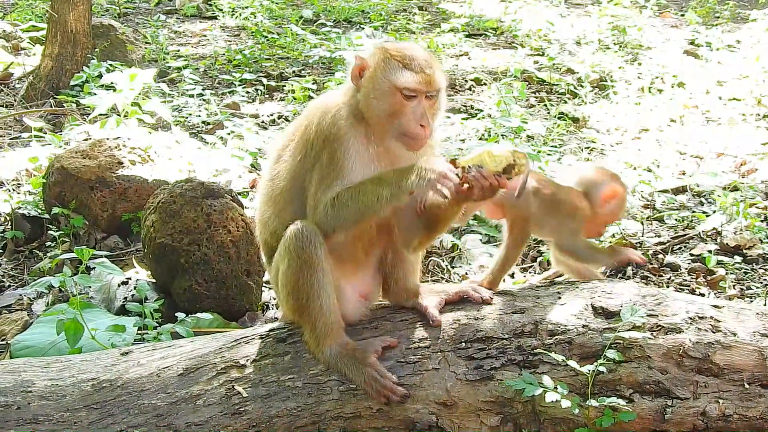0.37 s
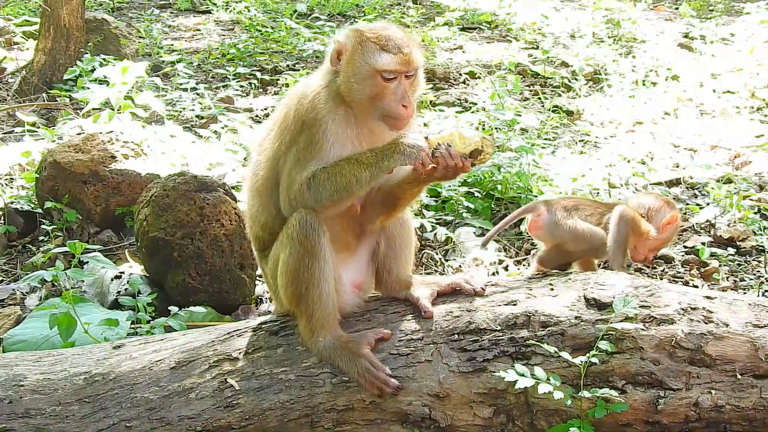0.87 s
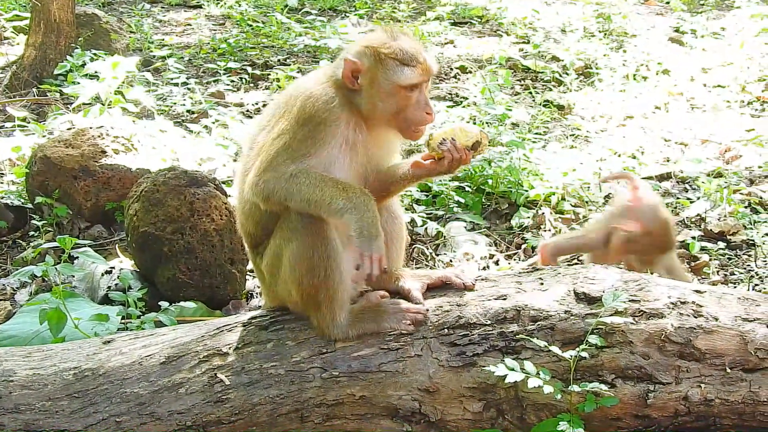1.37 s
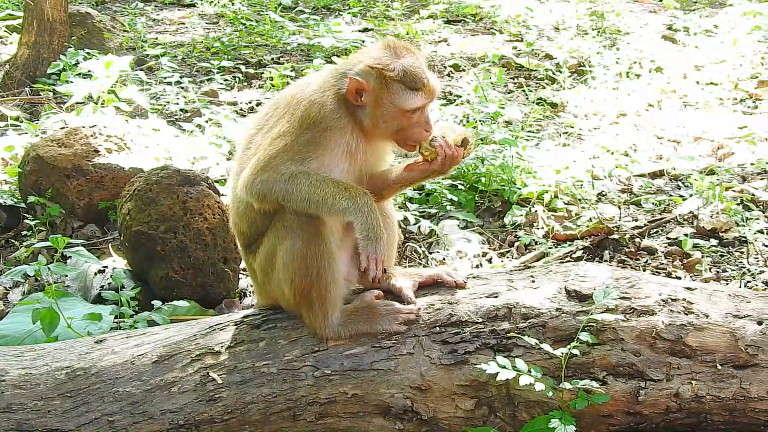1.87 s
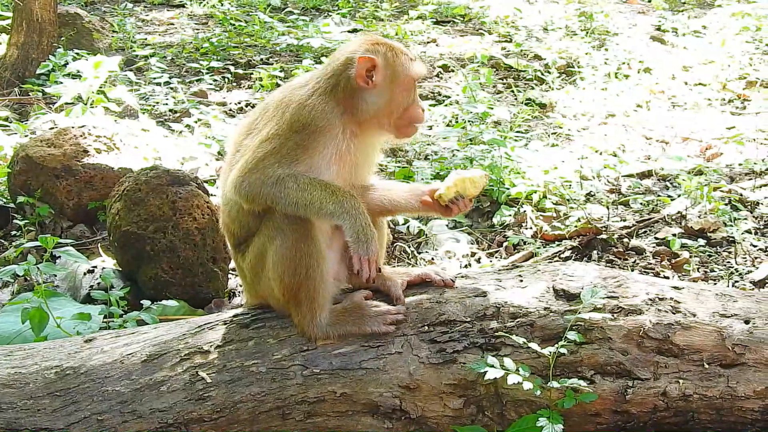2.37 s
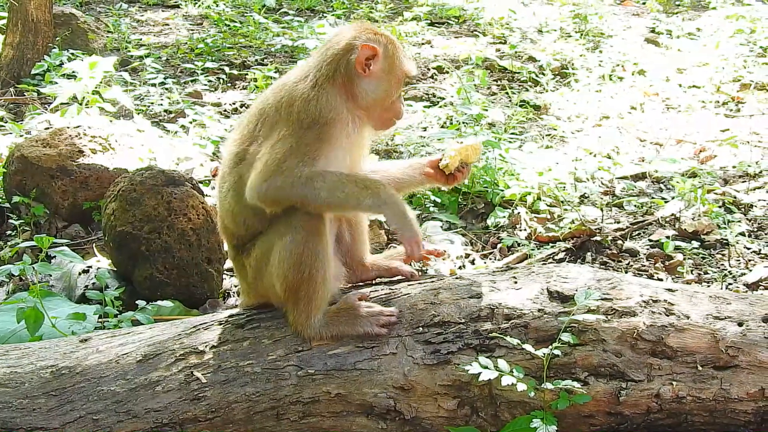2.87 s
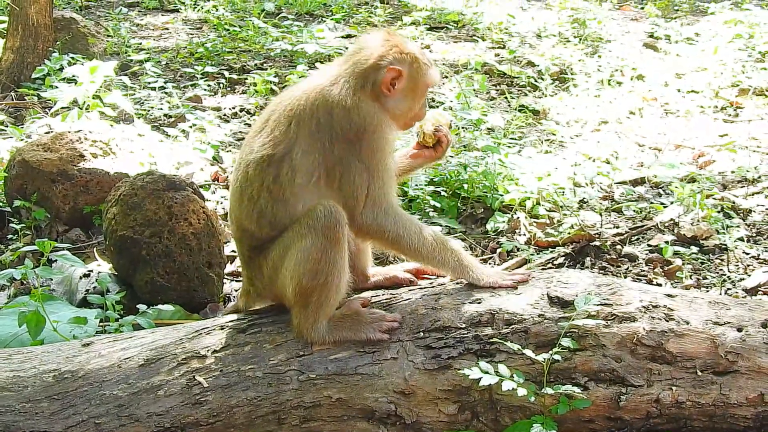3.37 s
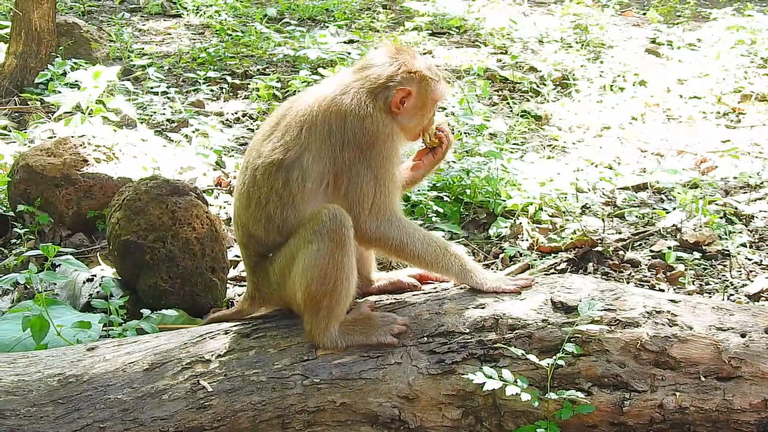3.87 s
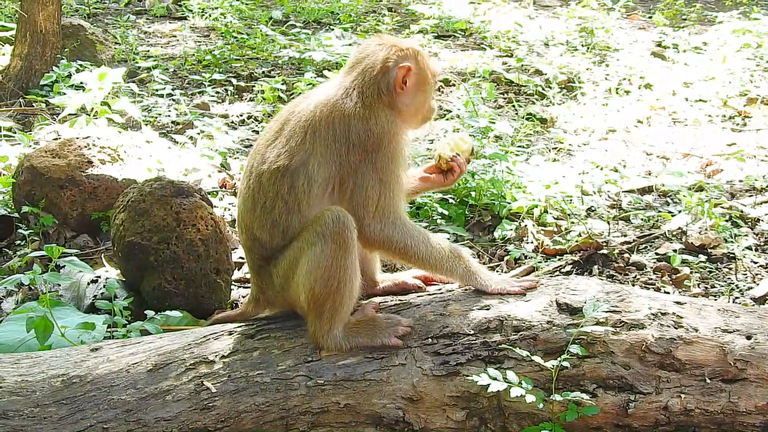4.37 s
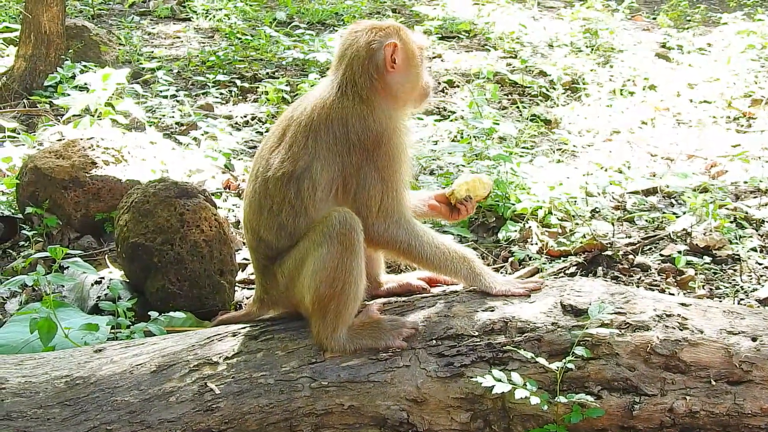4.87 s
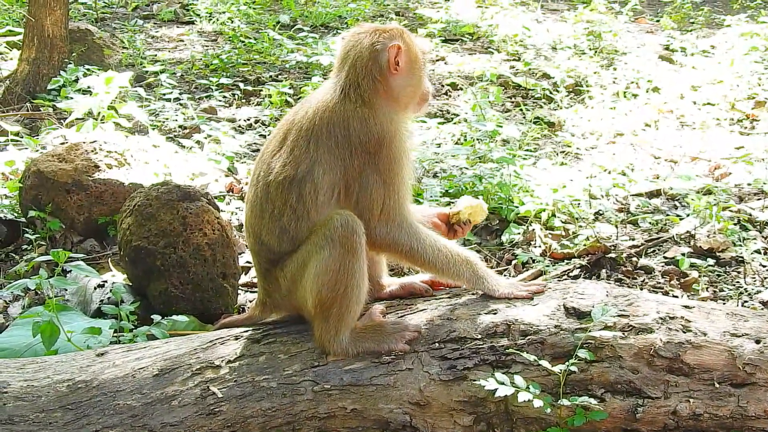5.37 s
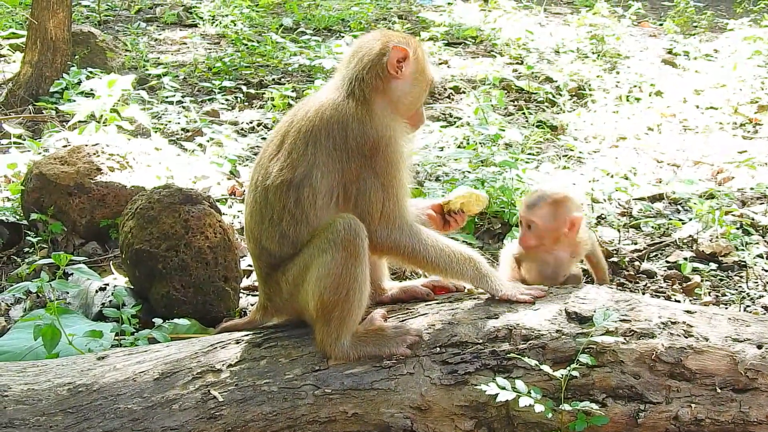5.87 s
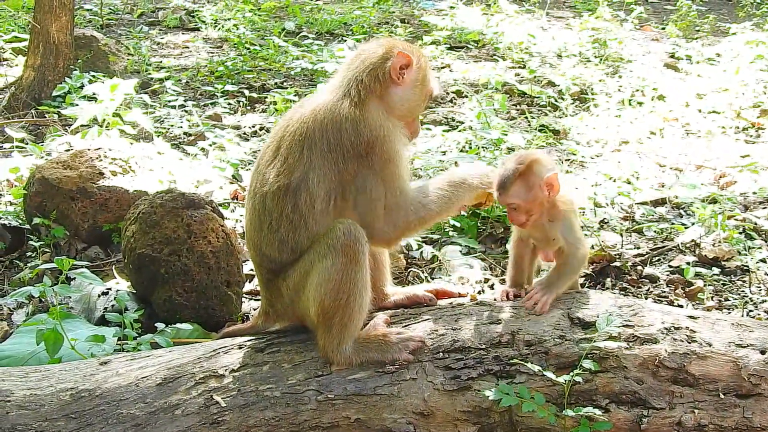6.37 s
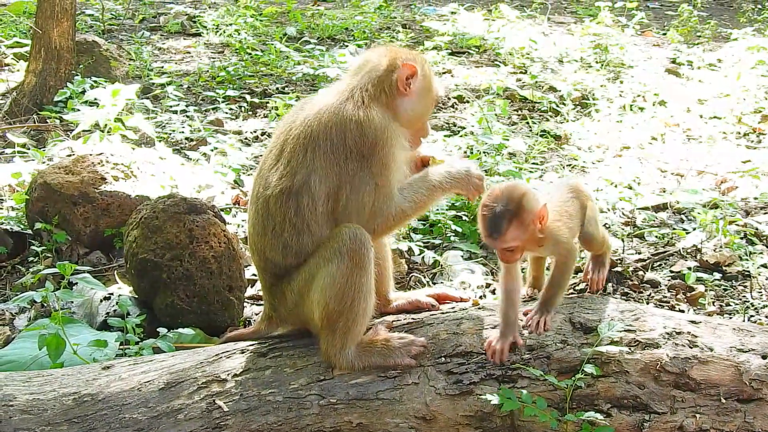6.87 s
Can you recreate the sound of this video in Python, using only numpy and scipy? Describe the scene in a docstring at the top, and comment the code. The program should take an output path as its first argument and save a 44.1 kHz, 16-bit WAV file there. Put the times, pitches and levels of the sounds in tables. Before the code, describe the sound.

In a sunny forest a cicada chorus whines steadily on one high, narrow pitch. A near bird gives crisp rising double ticks almost three times a second, with another bird's faint low drooping notes between. A lone cicada slightly right buzzes, sings four sagging phrases, then winds down. Leaves rustle, twigs crack and faint traffic rumbles. Open stereo microphone, with short echoes off the trees.

```python
"""A forest at midday. From the start a cicada chorus whines on one narrow band, from rows of ringing clicks, over
filtered noise for traffic rumble, leaves and thin high insects; one bird gives low, mostly drooping notes and a
near bird ticks upward in pairs, both as gliding tones. Twigs crack as noise bursts; a lone cicada, buzzing idly to
one side, then sings sagging phrases. Faint hoarse tone blips and soft patter sound, a farther bird slides down, and
the lone cicada winds down to its buzz. Decaying noise tails scatter all but the background noise off the trees."""
import sys
import numpy as np
from scipy import signal
from scipy.fft import rfft, irfft, next_fast_len
from scipy.io import wavfile
from scipy.ndimage import uniform_filter1d

SR = 44100
rng = np.random.default_rng(int(sys.argv[2]) if len(sys.argv) > 2 else 0)


def transcribe(signal):
    """Save signal, clipped to [-1, 1], as a 16-bit WAV file at the path in sys.argv[1]."""
    frames = np.atleast_2d(signal).T
    limited = np.clip(frames, -1, 1)
    pcm = np.round(limited * 32767).astype(np.int16)
    wavfile.write(sys.argv[1], SR, pcm)


def undo_db(level):
    """Turn decibels back into plain size, where 20 dB means ten times bigger."""
    steps = np.asarray(level, float) / 20
    return 10 ** steps


N = 319284
T = np.arange(N) / SR
SIZE = next_fast_len(N + SR)
HZ = np.arange(SIZE // 2 + 1) * SR / SIZE
LEAN_RIGHT = undo_db(np.array([[-.8], [.8]]))  # left and right gains


def unit(x):
    """Normalisation: scales a signal to rms 1."""
    return x / np.sqrt(np.mean(np.abs(x) ** 2))


def walk(rate):
    """Low-passed chance: random values at a rate per second, smoothed twice, with spread near 1."""
    hold = int(SR / rate)
    steps = np.repeat(rng.standard_normal(N // hold + 1), hold)
    return 1.2 * uniform_filter1d(uniform_filter1d(steps, hold), hold)[:N]


def ramp(s, length):
    """Linear onset: 0 before time s, rising straight to 1 over length."""
    return np.clip((T - s) / length, 0, 1)


def two_ears(mid, side, alike):
    """Interaural coherence: a shared and an opposed part; alike 1 is the same left and right."""
    alike = np.clip(alike, 0, 1)
    return np.sqrt(1 + alike) * mid + np.sqrt(1 - alike) * side * np.array([[1], [-1]])


def hiss(gain, alike, lag=0):
    """Spectral shaping: stereo noise of rms 1 with the given gain per frequency, left delayed by lag samples."""
    mid, side = irfft(rfft(rng.standard_normal((2, SIZE))) * gain, SIZE)[:, :N]
    left, right = two_ears(mid, side, alike)
    return unit(np.array([np.roll(left, lag), right]))


def colour(table):
    """Spectral envelope: gain per frequency through points of (frequency [Hz], level [dB])."""
    hz, db = np.transpose(table)
    return undo_db(np.interp(np.log(HZ + 1), np.log(hz), db, left=-120, right=-120))


def forest(x, t60, wet_db, delay, alike, grain_db=0.):
    """Multiple scattering: direct sound plus a tail of noise decaying 60 dB in t60 s, building up over delay s.

    Random steps of spread grain_db lump the tail into single trunks."""
    t = np.arange(SR) / SR
    lumps = undo_db(grain_db * np.repeat(rng.standard_normal(SR // 300 + 1), 300)[:SR])
    envelope = undo_db(-60 * t / t60) * (1 - np.exp(-t / delay)) * lumps
    mid, side = rng.standard_normal((2, SR)) * envelope
    tail = two_ears(mid, side, alike)
    tail = tail / np.sqrt(np.sum(tail ** 2, axis=1, keepdims=True))
    scattered = irfft(rfft(x * np.ones((2, 1)), SIZE) * rfft(tail, SIZE), SIZE)[:, :N]
    return x + undo_db(wet_db) * scattered


def tymbal(rate_hz, scatter_s, uneven_db, ring_hz, width_hz, accent_db=0., order=5):
    """Impulse-driven resonance: clicks at a rate each set off a short ring; a complex wave of rms 1."""
    cycles = np.cumsum(rate_hz) / SR + rng.random()
    timing, strength = rng.standard_normal((2, 4000))
    count = np.arange(1, int(cycles[-1]))
    at = np.interp(count, cycles, T)
    at = np.clip(at + np.interp(at, T, scatter_s) * timing[count], 0, T[-1])
    phase = 2 * np.pi * np.cumsum(ring_hz) / SR
    size = undo_db(uneven_db * strength[count] + accent_db * (count % 4 == 0))  # ribs buckle in fours
    clicks = np.zeros(N, complex)
    # shifted down to 0 Hz, so that a low-pass acts as the ring and follows its pitch
    np.add.at(clicks, (at * SR).astype(int), size * np.exp(-1j * np.interp(at, T, phase)))
    ring = signal.butter(order, width_hz / 2, fs=SR, output="sos")
    return unit(signal.sosfilt(ring, clicks)) * np.exp(1j * phase)


def whistle(out, s, length, hz0, hz1, db, bend=1., flutter=0., flutter_hz=60., late=1., point=0.23,
            hoarse_hz=0.):
    """Frequency modulation: adds a gliding near-sine note at time s.

    bend over 1 slows the glide towards its end, late over 1 puts the loudest part later, a higher point
    sharpens the swell, hoarse_hz shakes the pitch."""
    u = np.arange(int(length * SR)) / (length * SR)
    shake = hoarse_hz * np.repeat(rng.standard_normal(len(u) // 128 + 1), 128)[:len(u)]
    hz = hz1 + (hz0 - hz1) * (1 - u) ** bend + shake
    tone = np.sin(2 * np.pi * np.cumsum(hz) / SR)
    tremolo = 1 + flutter * np.sin(2 * np.pi * (flutter_hz * length * u + rng.random()))
    shape = np.sin(np.pi * u ** late) ** point * tremolo
    out, i = out.copy(), max(int(s * SR), 0)
    out[i:i + len(u)] += (undo_db(db) * shape * tone)[:N - i]
    return out


def chorus():
    """Superposed resonators: five cicadas near one click rate waver together and swell singly; two lead."""
    ring_hz, waver_hz, waver_s, waver_low_s = 5428, 29.9, .8, 2.93  # the pitch is lowest at waver_low_s
    hz = ring_hz - waver_hz * np.cos(2 * np.pi * (T - waver_low_s) / waver_s)
    db, pan_db = -43 + 0.5 * walk(4.05), -1.1 + 0.88 * walk(1.3)
    voices = [(57.2, 0, -10), (61, -1.5, 20), (56.3, -4, 10), (59, -6, -25), (63, -6, 25)]
    out = 0
    # (click rate [Hz], level [dB], ring offset [Hz])
    for rate_hz, gain_db, off_hz in voices:
        rate = rate_hz * hz / ring_hz * (1 + .008 * walk(5.0))
        one = tymbal(rate, 12e-6 + 0 * T, 0.71, hz + off_hz, 215.0, order=4).real
        out = out + one * undo_db(gain_db + 1.33 * walk(14.0))
    return unit(forest(out, 0.27, -2.5, 0.014, 0.0)) * undo_db(db + np.array([pan_db, -pan_db]) / 2)


def song():
    """Exponential relaxation: pitch, level and click scatter of phrases that jump and sag between idle buzzes."""
    # lone cicada's phrases: (start [s], opening pitch [Hz], pitch it sags towards [Hz])
    phrases = [(.72, 6300, 6280), (.98, 6410, 5970), (1.98, 6340, 6120), (2.61, 6310, 6150)]
    # the first phrase breaks into a buzz: (start [s], end [s], extra click scatter [microseconds])
    blur = (.84, .96, 18)
    sag_s, jump_s = .85, .04
    song_db, end_s, onset_s = -48.5, 3.9, 0.1
    idle_hz, wind_down_s, wind_down_db_per_s, idle_db = 6090, .25, 5, -61
    # click scatter in full song, extra while warming up (fading over warm_s), and when idling
    steady_us, warm_us, warm_s, idle_us = 3.5, 8, .25, 48

    start = phrases[0][0]
    hz = idle_hz + 0 * T
    for s, open_hz, sag_hz in phrases:
        sagging = sag_hz + (open_hz - sag_hz) * np.exp(-np.maximum(T - s, 0) / sag_s)
        hz = hz + ramp(s - jump_s, jump_s) * (sagging - hz)
    after = np.maximum(T - end_s, 0)
    hz = idle_hz + (hz - idle_hz) * np.exp(-after / wind_down_s)

    on = ramp(start - onset_s / 2, onset_s)
    db = np.maximum(idle_db + on * (song_db - idle_db) - wind_down_db_per_s * after, idle_db)

    singing = on * (1 - ramp(end_s - jump_s, 2 * jump_s))
    tight_us = steady_us + warm_us * np.exp(-np.maximum(T - start, 0) / warm_s)
    blur_start, blur_end, blur_us = blur
    tight_us = tight_us + blur_us * (ramp(blur_start, jump_s) - ramp(blur_end, jump_s))
    return hz, db, idle_us + singing * (tight_us - idle_us)


def solo():
    """Periodicity: steady clicks give sharp lines, scattered ones a buzz; two tymbals run slightly apart."""
    # body resonance of the lone cicada: (centre [Hz], width [Hz], level [dB])
    solo_ring = [(6360, 1900, 0)]
    hz, db, scatter_us = song()
    wave = 0
    for detune, gain_db, waver_db, width_hz in [(1, 0, 1., 520.), (1.016, -7.5, 2, 300.)]:
        rate_hz = hz / 17 * detune * (1 + .0028 * walk(60))  # the pitch is the 17th multiple of the click rate
        one = tymbal(rate_hz, np.abs(scatter_us) * 1e-6, .7, hz * detune ** 2, width_hz, accent_db=1.5, order=2)
        wave = wave + one * undo_db(gain_db + waver_db * walk(4.65) + 2.14 * walk(29.98))
    resonance = sum(undo_db(d) / (1 + ((HZ - f) / (w / 2)) ** 2) for f, w, d in solo_ring)
    # it sits off to the right, so the left ear lags in phase and is a little weaker
    ears = np.array([(wave * np.exp(-1.6j)).real * undo_db(-0.5), wave.real])
    ears = irfft(rfft(ears, SIZE) * resonance, SIZE)[:, :N]
    return unit(forest(ears, .3, -1.0, 0.0041, 0.08)) * undo_db(db)


def traffic():
    """Band-limited noise: a distant low rumble that swells once, with narrow bands of engine hum."""
    # rumble spectrum: (frequency [Hz], relative level [dB])
    rumble_colour = [(13, -35), (26, -30.5), (53, -0.5), (76, 0), (167, -2), (257, -16.5), (330, -28.5),
                     (430, -49), (730, -120)]
    # engine hum: (centre [Hz], half width [Hz], rms level before the lean to the right [dB])
    engine_hum = [(78.7, 10.5, -62.5), (163.2, 10.2, -72.5)]
    # swell of the rumble: (time [s], half length [s], rise [dB])
    rumble_swell = (6.4, 0.24, 2.1)
    at, half, peak_db = rumble_swell
    swell_db = peak_db * np.exp(-((T - at) / half) ** 2)
    rumble = hiss(colour(rumble_colour), 0.87) * undo_db(-57.0 + 1.0 * walk(2.99) + swell_db)
    hum = sum(hiss(np.exp(-((HZ - hz) / w) ** 2), 1.0) * undo_db(db) for hz, w, db in engine_hum)
    return (rumble + hum) * LEAN_RIGHT


def stir():
    """Envelope: leaf agitation over calm, in dB ahead of each layer's own factor, growing slowly."""
    # stirrings of the leaves: (start [s], rise [s], fade [s], agitation [dB before each layer's factor])
    stirs = [(1.35, 0.21, 0.15, 3), (3.1, 0.29, 0.19, 2.5), (4.45, .2, 0.42, -1), (5.36, 0.055, 0.99, 3),
             (6.23, 0.066, 0.4, 6.5)]
    db = 0.21 * T
    for s, rise, fade, peak_db in stirs:
        db = db + peak_db * ramp(s, rise) * np.exp(-np.maximum(T - s - rise, 0) / fade)
    return db


def leaves():
    """Broadband friction noise: rustle in three stirring bands, the top one a hiss that wavers in level."""
    # leaf noise spectrum: (frequency [Hz], relative level [dB])
    leaf_colour = [(150, -16), (260, -7), (650, -5.5), (1200, -8), (1620, -7), (1800, -9.5), (2800, -3.5),
                   (4000, 2), (5000, 5), (5800, 2), (6400, -1), (7300, -5.5), (8000, -14.5), (9200, -22.5),
                   (11500, -29), (13000, -32.5), (15600, -35)]
    stir_db, spectrum = stir(), colour(leaf_colour)
    low = 1 / (1 + (HZ / 2920.0) ** 4)
    rustle = hiss(spectrum * low, 0.64) * undo_db(-65 + 0.65 * stir_db + 1.0 * walk(20))
    middle = hiss(spectrum * (1 - low) * (HZ < 5600), 0.63) * undo_db(-63.5 + 0.58 * stir_db + 1.0 * walk(8.6))
    high = hiss(spectrum * (HZ >= 5600), 0.25, lag=1) * undo_db(-60.0 + 0.64 * stir_db + 1.73 * walk(8))
    return (rustle + middle + high) * LEAN_RIGHT


def insects():
    """Narrow-band noise: thin high insect bands, each wavering in level by itself."""
    # insect bands: (centre [Hz], half width [Hz], mean level before the lean to the right [dB])
    katydids = [(9390, 110, -83), (10200, 80, -92), (11050, 110, -91), (13300, 120, -93), (14100, 120, -98)]
    out = 0
    for hz, w, db in katydids:
        out = out + hiss(np.exp(-((HZ - hz) / w) ** 4), 0.25) * undo_db(db + 1.1 * walk(3.4))
    return out * LEAN_RIGHT


def undergrowth(x):
    """Short-path scattering: the brief tail and rightward lean shared by the small sounds."""
    return forest(x, 0.092, -1.1, 0.00099, 0.78) * LEAN_RIGHT


def leaf_snaps():
    """Random impulses: tiny band-passed leaf snaps whose level follows the stirring."""
    snaps_per_s = 320
    size = undo_db(-62.5 + 1.5 * stir() + 3.0 * rng.uniform(-1.5, 1.5, N))
    snaps = (rng.random(N) < snaps_per_s / SR) * size * rng.choice([-1, 1], N)
    band = signal.butter(2, [900., 3500.], "band", fs=SR, output="sos")
    return undergrowth(signal.sosfilt(band, snaps))


def long_tail(x):
    """Late scattering: the slowly decaying tail alone, without the direct sound."""
    return forest(x, 1.06, -2.6, 0.025, 0.88, grain_db=2.0) - x


def low_bird():
    """Swept tones: a bird's low, mostly drooping notes, made hoarse by a shaken pitch."""
    # low notes: (start [s], length [s], start pitch [Hz], end pitch [Hz], level before scatter [dB])
    low_notes = [(0, 0.02, 2366, 2310, -57.5), (0.311, 0.064, 2455, 2364, -60.5),
                 (0.666, 0.064, 2460, 2360, -64), (1.036, 0.053, 2415, 2260, -62.5),
                 (1.391, 0.051, 2450, 2350, -64), (1.741, 0.096, 2420, 2276, -65),
                 (2.117, 0.058, 2490, 2370, -64), (2.254, 0.076, 2260, 2180, -71),
                 (2.499, 0.098, 2430, 2250, -68.5), (2.868, 0.08, 2420, 2290, -67.5),
                 (3.228, 0.069, 2465, 2300, -68), (3.572, 0.091, 2450, 2315, -68),
                 (3.67, 0.063, 2260, 2230, -73), (3.949, 0.043, 2425, 2330, -66.5),
                 (4.221, 0.23, 2250, 2305, -70), (4.72, 0.082, 2400, 2270, -68.5),
                 (5.067, 0.074, 2420, 2240, -68.5), (5.86, 0.054, 2495, 2460, -66),
                 (6.663, 0.065, 2306, 2280, -65), (7.037, 0.052, 2420, 2300, -72)]
    low = np.zeros(N)
    for row in low_notes:
        low = whistle(low, *row, bend=.8, flutter=0.35, flutter_hz=38., late=.6, hoarse_hz=25.)
    return forest(low, 0.25, -1.0, 0.0047, 0.88, grain_db=-2.0) + long_tail(undo_db(-6.0) * low)


def near_bird():
    """Swept tones: a near bird ticks upward in pairs of rising notes with a short break between."""
    # ticks: (time of the break [s], level of the first note before scatter [dB], top of the second note [Hz])
    ticks = [(.221, -46, 4620), (0.579, -46, 4580), (0.943, -46.5, 4670), (1.303, -47.5, 4680),
             (1.668, -49, 4560), (2.028, -47.5, 4740), (2.397, -47.5, 4590), (2.769, -45, 4670),
             (3.144, -46.5, 4680), (3.491, -46, 4620), (3.866, -46, 4600), (4.252, -47, 4560),
             (4.628, -47.5, 4560), (4.978, -47, 4570), (5.397, -47.5, 4480), (5.771, -47.5, 4640),
             (6.138, -48.5, 4520), (6.53, -47, 4590), (6.947, -50.5, 4700)]
    near = np.zeros(N)
    for (s, db, top_hz), (lead, vary) in zip(ticks, rng.standard_normal((len(ticks), 2))):
        near = whistle(near, s - .016, .031, 2900 + 90 * lead, 3990, db,
                       bend=1.45, flutter=0.15, flutter_hz=170., late=1.05, point=1.)
        near = whistle(near, s + .016, .028, 3600, top_hz, db - 2.0 + 1.8 * vary,
                       bend=2.1, flutter=.3, flutter_hz=170., late=.9, point=1.)
    return forest(near, 0.17, 0.0, 0.0057, 0.81, grain_db=2.0) + long_tail(near)


def cracks():
    """Damped noise bursts: twigs and dry leaves crack for milliseconds, each through its own resonance."""
    # cracks: (start [s], peak level before scatter [dB], centre [Hz], width of each filter pass [Hz])
    crack_rows = [(.487, -66, 8000, 4060), (.855, -57.5, 1800, 2000), (1.417, -51.5, 1000, 800),
                  (1.428, -56, 8200, 5070), (1.57, -61, 8500, 3930), (1.705, -64, 9500, 4000),
                  (1.714, -50, 6850, 5000), (1.89, -63, 8000, 3980), (2.734, -55, 1280, 870),
                  (3.241, -53, 8100, 4000), (3.244, -60, 734, 400), (5.193, -61, 2490, 2000),
                  (5.662, -67, 7700, 4040), (5.68, -50, 2700, 2000), (6.262, -48, 2130, 2000),
                  (6.903, -52, 1490, 1800)]
    out, t = np.zeros(N), np.arange(1500) / SR
    for (s, db, hz, width_hz), grain in zip(crack_rows, rng.standard_normal((len(crack_rows), len(t)))):
        b, a = signal.iirpeak(hz, hz / width_hz, fs=SR)
        burst = grain * np.exp(-t / 0.0087)
        for _ in range(3):
            burst = signal.lfilter(b, a, burst)
        i = int(s * SR)
        out[i:i + len(t)] += undo_db(db) * burst / np.abs(burst).max()
    return forest(out, .15, -10, .005, .3)


def tone_blips():
    """Random frequency modulation: faint hoarse tone blips between about 300 and 1150 Hz, of no known source."""
    # tone blips: (start [s], length [s], pitch [Hz], level before a 3 dB cut [dB])
    blip_rows = [(1.496, 0.038, 916, -67), (1.545, 0.031, 470, -61), (1.598, 0.026, 462, -70),
                 (1.668, 0.031, 1077, -66), (1.724, 0.031, 1080, -66), (1.803, 0.036, 1094, -67),
                 (1.95, 0.038, 1080, -69), (2.24, 0.084, 800, -67.5), (2.357, 0.05, 900, -66),
                 (2.934, 0.066, 670, -71), (3.025, 0.045, 649, -59.5), (3.149, 0.052, 290, -66),
                 (3.231, .04, 710, -70), (3.288, 0.049, 367, -66), (3.448, 0.032, 1005, -65),
                 (3.635, 0.031, 1147, -67), (4.435, .05, 970, -69), (4.579, .08, 776, -67),
                 (4.6, 0.099, 1076, -69), (4.749, 0.033, 956, -64), (4.86, 0.069, 1067, -64),
                 (4.963, 0.057, 300, -62), (5.041, 0.04, 920, -68), (5.164, 0.047, 1120, -67),
                 (6.378, 0.058, 952, -68), (6.689, 0.043, 1102, -65.5), (6.69, 0.057, 497, -64)]
    out = np.zeros(N)
    for s, length, hz, db in blip_rows:
        out = whistle(out, s, length, hz, 1.015 * hz, db - 3, flutter=0.51, flutter_hz=45., hoarse_hz=70.)
    return undergrowth(out)


def patter():
    """Random tone bursts: soft dull patter low in the undergrowth, scattered in time and pitch."""
    # spells: (start [s], end [s], centre [Hz], spread [Hz, reaching 1.5 times either way], mid level [dB])
    spells = [(1.503, 1.947, 811, 294, -68.5), (3.15, 3.561, 601, 200, -69), (4.395, 5.199, 891, 197, -70),
              (6.264, 6.947, 805, 344, -68)]
    out = np.zeros(N)
    for start, end, hz, spread_hz, db in spells:
        count = int(40 * (end - start)) + 1
        for when, pitch, size in rng.random((count, 3)):
            centre = hz + spread_hz * (3 * pitch - 1.5)
            at = start + when * (end - start)
            out = whistle(out, at, 0.024, centre, 1.007 * centre, db + 10 * (size - .5))
    return undergrowth(out)


def far_bird():
    """Direct-to-scattered ratio: falling whistles sound distant because the tail outweighs the direct sound."""
    # slides: (start [s], length [s], start pitch [Hz], end pitch [Hz], level before a 0.5 dB cut [dB])
    slides = [(1.902, 0.093, 5230, 3020, -61), (2.23, 0.056, 4450, 3000, -62),
              (2.519, 0.041, 4490, 3050, -59.5), (3.036, 0.052, 4960, 2850, -60),
              (3.311, 0.045, 4500, 2930, -62), (3.595, 0.067, 4820, 2830, -59.5),
              (3.9, 0.049, 4170, 2790, -65), (4.162, 0.041, 3980, 2870, -65),
              (5.37, 0.044, 5160, 3900, -60)]
    far = np.zeros(N)
    for row in slides:
        far = whistle(far, *row, bend=1.05, flutter=0.6, flutter_hz=110., late=1.05)
    return forest(undo_db(-0.5) * far, 0.72, 8.6, 0.0037, 0.85, grain_db=1.5)


def scene():
    """Superposition: the pressures of all sources add."""
    background = traffic() + leaves() + insects()
    birds = low_bird() + near_bird() + far_bird()
    small_sounds = leaf_snaps() + cracks() + tone_blips() + patter()
    return chorus() + solo() + background + birds + small_sounds


def band_limit(x):
    """A steep low-pass at the top of the band."""
    return signal.sosfilt(signal.butter(12, 15700, fs=SR, output="sos"), x)


def record(dry):
    """Signal chain: the finished mix passes through the last stage."""
    return band_limit(dry)


dry = scene()
out = record(dry)
transcribe(out)
```